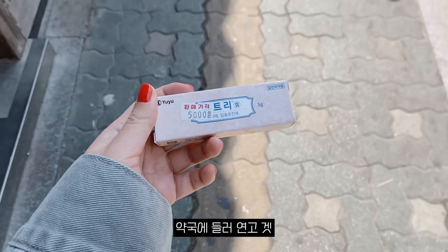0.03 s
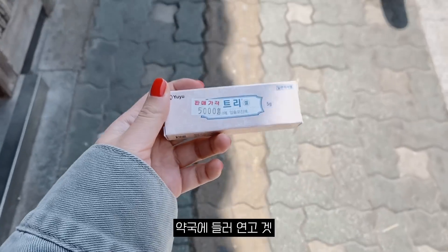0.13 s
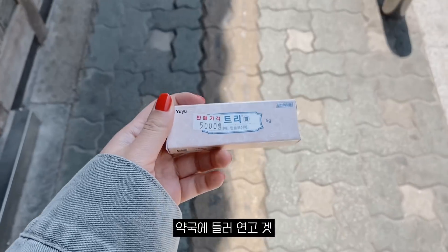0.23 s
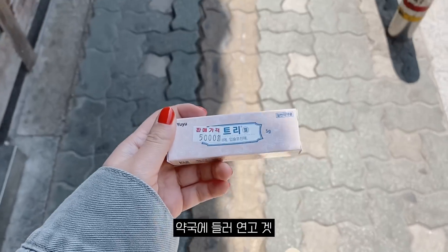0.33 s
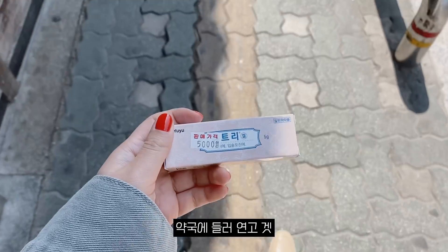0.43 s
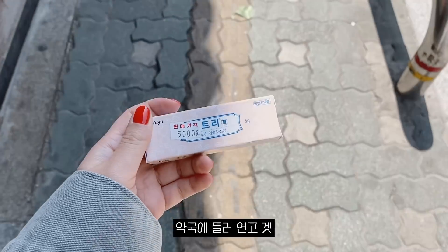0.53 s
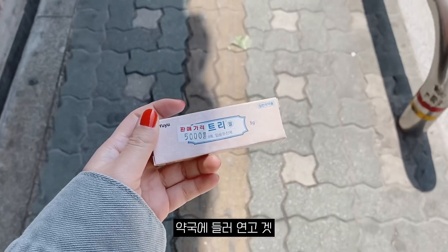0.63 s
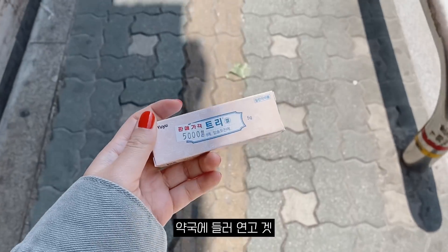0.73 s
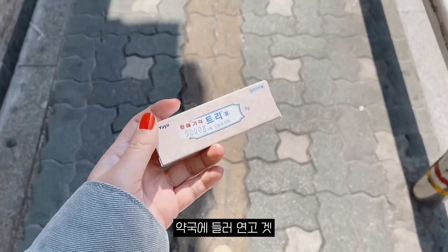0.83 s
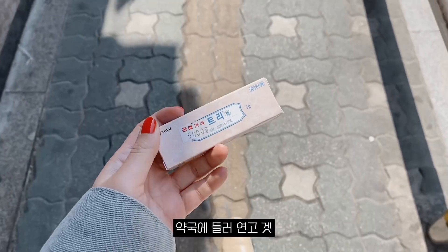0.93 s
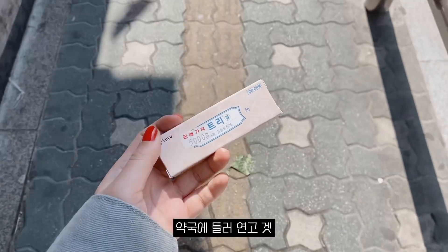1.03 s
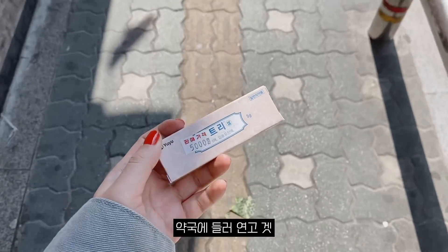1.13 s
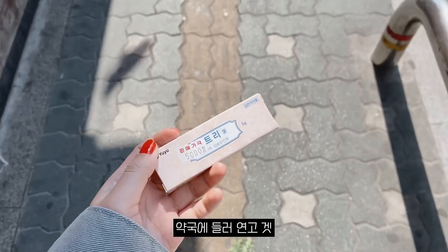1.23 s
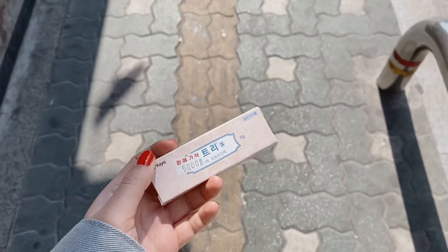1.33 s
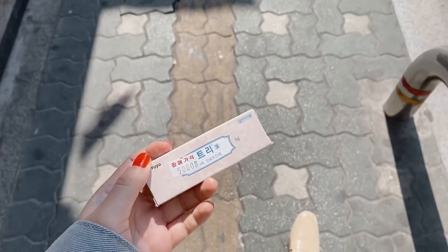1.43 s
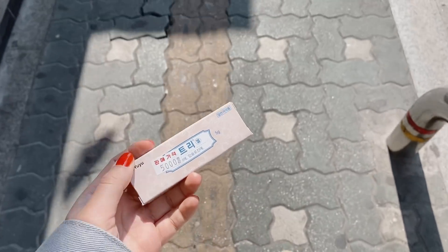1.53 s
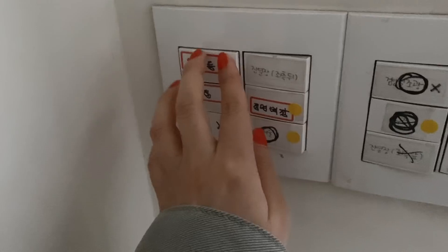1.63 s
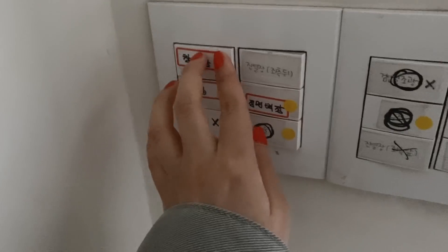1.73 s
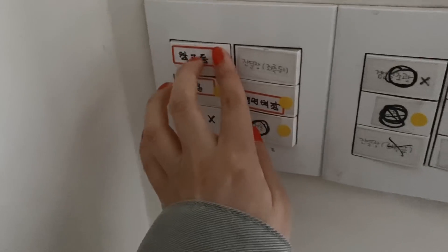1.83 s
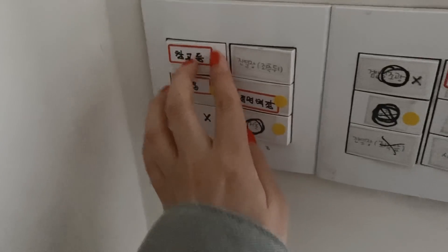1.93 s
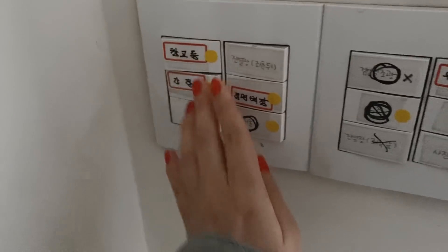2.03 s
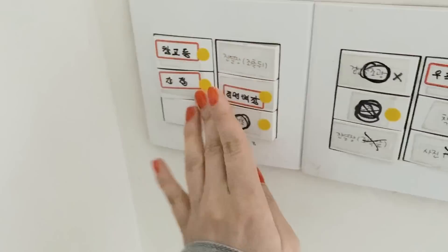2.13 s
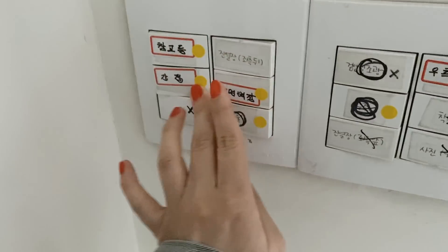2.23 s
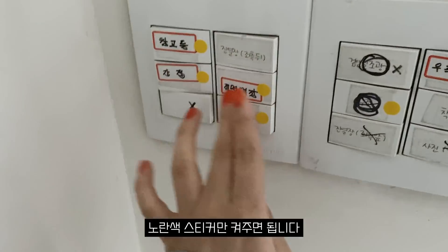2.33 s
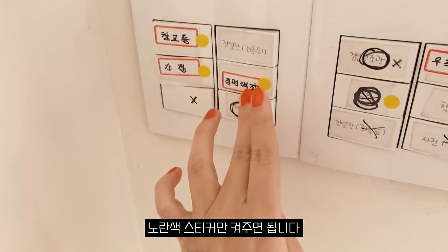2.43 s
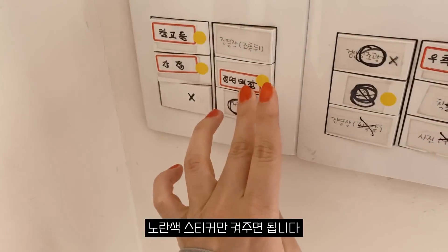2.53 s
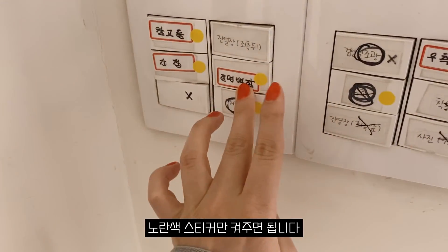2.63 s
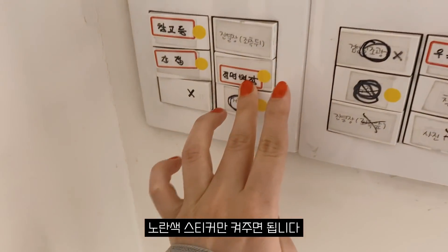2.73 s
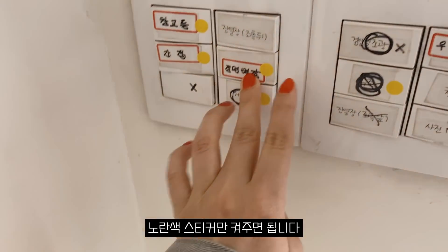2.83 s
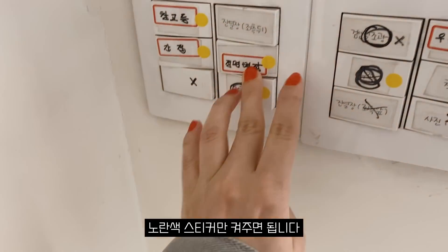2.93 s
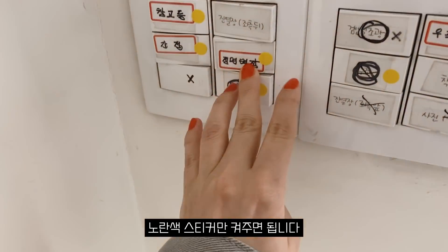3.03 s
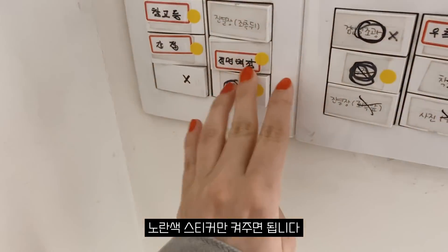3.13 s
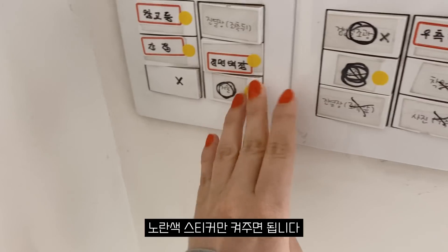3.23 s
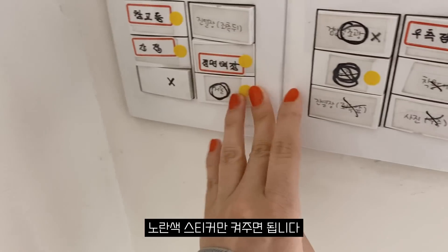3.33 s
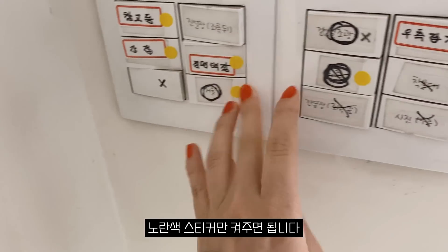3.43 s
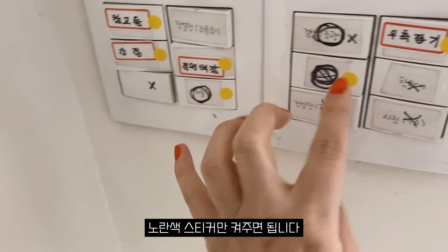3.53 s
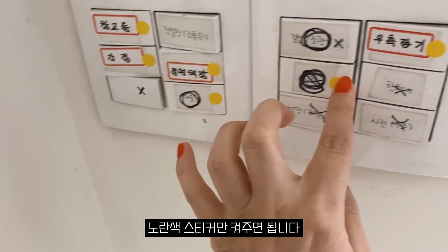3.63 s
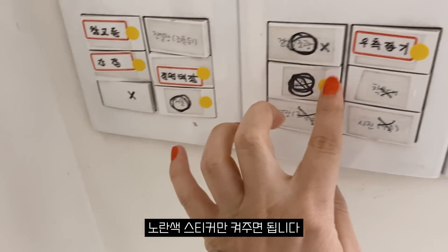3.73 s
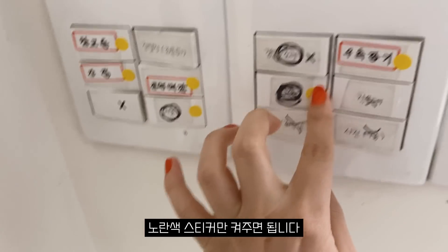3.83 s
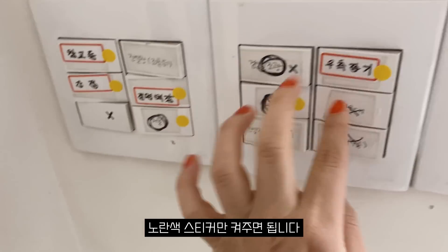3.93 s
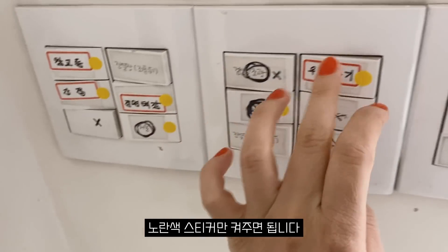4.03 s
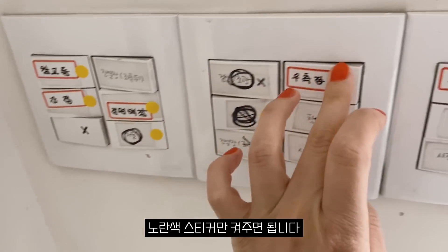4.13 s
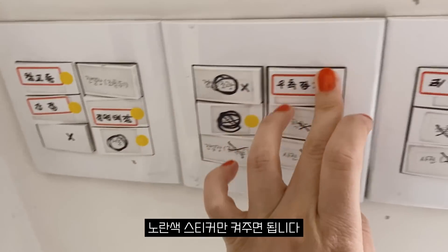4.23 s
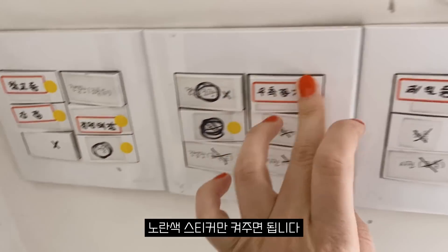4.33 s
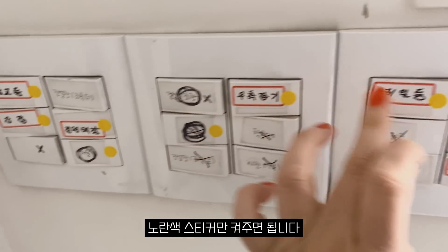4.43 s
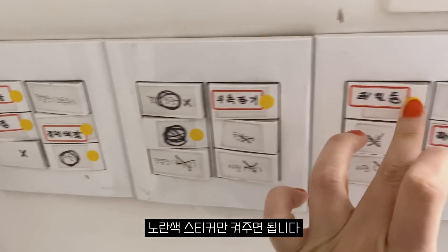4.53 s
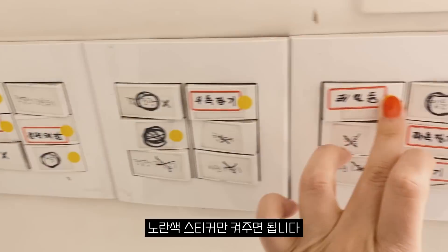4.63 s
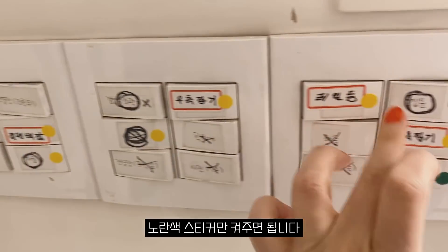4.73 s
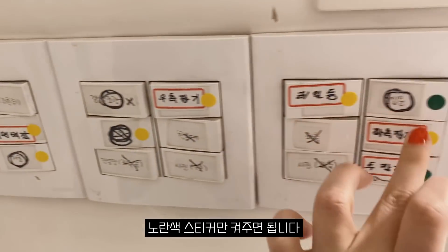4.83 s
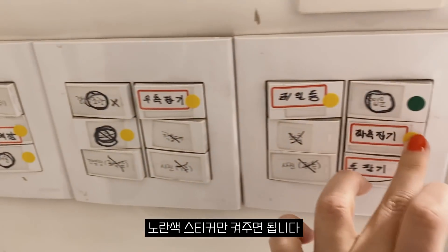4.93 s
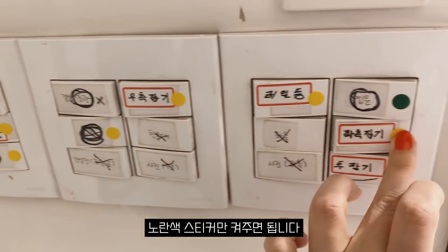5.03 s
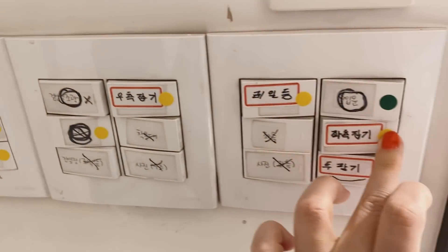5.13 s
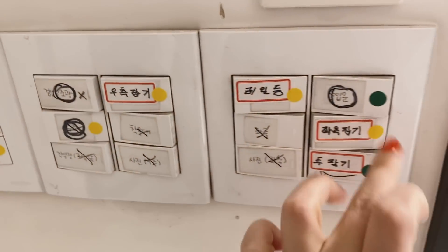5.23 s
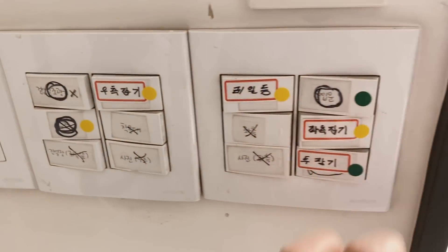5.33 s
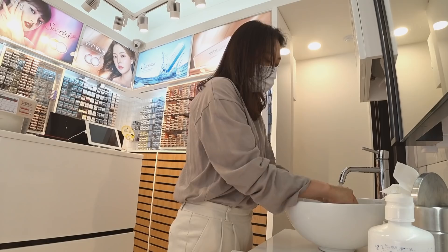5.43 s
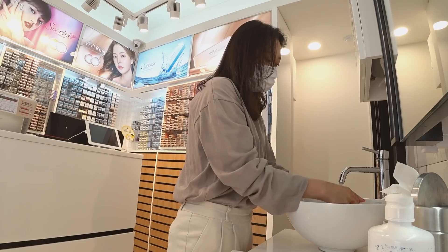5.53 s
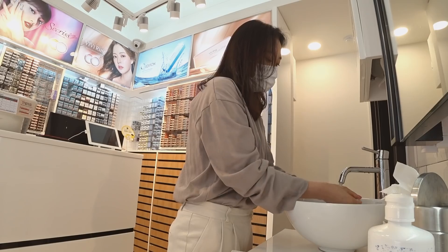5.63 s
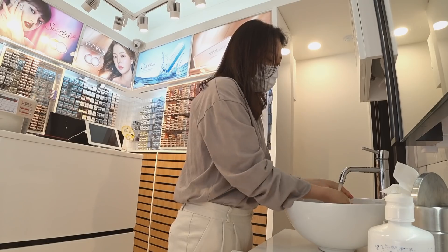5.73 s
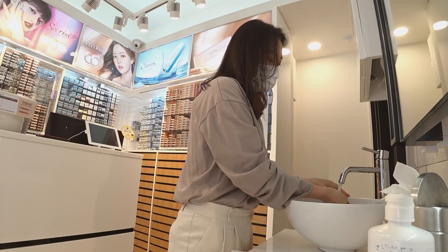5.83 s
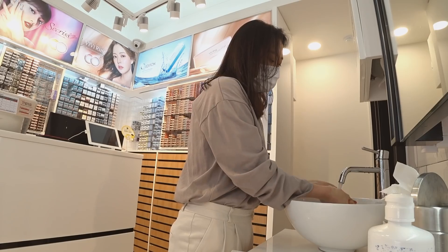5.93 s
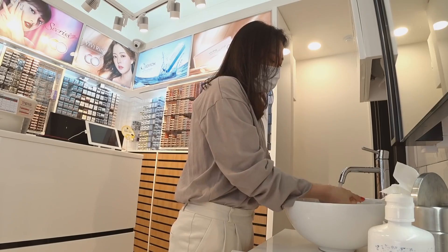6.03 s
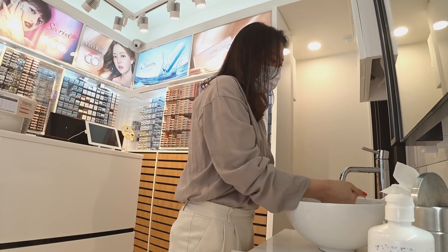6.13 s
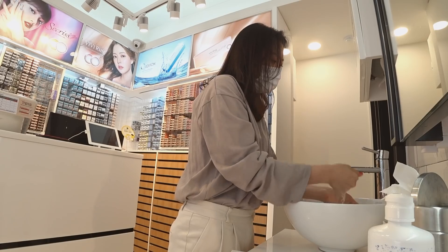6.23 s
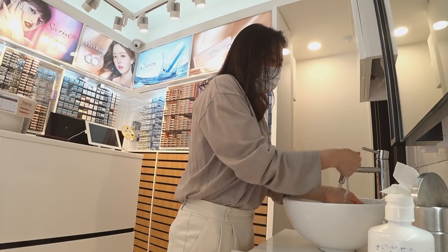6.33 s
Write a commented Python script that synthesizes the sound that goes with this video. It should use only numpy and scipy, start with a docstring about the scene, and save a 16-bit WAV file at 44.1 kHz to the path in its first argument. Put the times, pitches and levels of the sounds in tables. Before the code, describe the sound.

Soft street noise with thumps on the camera stops abruptly. In a hushed small room, eight wall switches click on unevenly, roughly every half second, loud and close in stereo, with short room echo and light fingertip taps between them. Then, at another abrupt cut, running water fills the scene: an aerated jet in a hard basin, with fine droplets, spatters and low appliance hum.

```python
"""Eight plastic rocker switches snap on in a quiet shop, close to a stereo microphone: each is a contact
tick, a plate clack, a wall thud and a faint ring, with soft finger touches and rustle around them.
Before it comes a pavement: shaped noise for traffic and wind, bumps on a hand-held camera, gritty scuffs.
After it a tap runs into a ceramic basin: noise through resonances, rising droplet chirps and spatters,
over an appliance hum of three sines."""
import sys
import numpy as np
from scipy import signal
from scipy.fft import rfft, irfft, next_fast_len
from scipy.io import wavfile
from scipy.ndimage import uniform_filter1d, map_coordinates

SR = 44100
rng = np.random.default_rng(int(sys.argv[2]) if len(sys.argv) > 2 else 0)


def log_audio(samples):
    """Write samples as a 16-bit WAV file to the path given in sys.argv[1]."""
    # one column per channel
    frames = np.atleast_2d(samples).T
    # limit to full scale, then quantise
    limited = np.clip(frames, -1, 1)
    pcm = np.round(limited * 32767).astype(np.int16)
    wavfile.write(sys.argv[1], SR, pcm)


N = 281212
TIME = np.arange(N) / SR
SHOP_S, BASIN_S = 1.641, 5.4365  # where the shop and the basin begin (s)

# Rocker snaps at close range; levels are rms over the first 40 ms, before the left-right shading.
# Each row: start in seconds, plate clack in dB, contact tick in dB, lingering ring in dB,
# wall thud in dB, favoured wall mode in Hz, lift of the lowest wall modes in dB.
SNAPS = [(1.838, -31, -24.5, -57.5, -32, 330, 9.5), (2.181, -28, -22.5, -57, -26, 400, -15.5),
         (2.9766, -28.5, -24, -55, -33.5, 470, 6.5), (3.3383, -25, -23, -54, -33.5, 480, 11),
         (3.7868, -28.5, -21.5, -57.5, -33, 422, 8.5), (4.2502, -26.5, -23, -51.5, -33.5, 145, 1),
         (4.6159, -26, -23, -54.5, -36, 330, 0), (5.0118, -24.5, -25, -53.5, -37, 470, 3)]
# Each rocker's own resonances, one list for each snap. Each row: centre in Hz, lift in dB.
ROCKER_RESONANCES = [
    [(980, 7.5), (1420, 3.5), (3740, 8), (4790, 4.5), (6500, 10.5), (7600, 16.5), (12350, 3)],
    [(830, 11), (1050, 6), (1400, 5), (1840, 7.5), (2730, 1.5), (6640, 5.5), (9420, 3)],
    [(1000, 5.5), (1370, 12.5), (1920, 6), (4530, 7.5), (6870, 5.5), (8700, 8.5), (10910, 4)],
    [(750, 4.5), (1370, 2), (2350, 13), (2750, 7), (5180, 3.5), (6210, 2.5), (8320, 8)],
    [(1150, 7), (1280, 7.5), (2610, 10.5), (4580, 6.5), (6420, 4), (9210, 6.5), (11540, 7)],
    [(790, 7), (1340, 11), (2030, 7), (2610, 7), (3820, 8.5), (6790, 4.5), (9310, 5.5)],
    [(830, 7.5), (1050, 5.5), (2010, 12.5), (2610, 2), (3950, 7), (6790, 6.5), (8610, 5)],
    [(1270, 6), (2030, 13.5), (2350, 9.5), (2690, 15), (3750, 3.5), (4840, 11), (8040, 3), (9740, 4.5)],
]
ROCKER_Q, BEAMED = 8, .6  # sharpness; share of the lift heard only in the direct sound
# Colour of the plastic plate. Each row: frequency in Hz, relative level in dB.
PLATE_COLOUR = [(250, -42.5), (520, -6), (800, -5.5), (1300, -2.5), (1620, -5), (2100, -1.5), (2600, -3.5),
                (3200, -7.5), (4500, -6), (5300, -6.5), (7500, -47)]
# Colour of the spring contact. Each row: frequency in Hz, relative level in dB.
CONTACT_COLOUR = [(3500, -42.5), (5200, -8), (6500, -3.5), (7800, -0.5), (9400, 1.5), (10400, -2),
                  (11300, -3), (13200, -6), (15000, 3.5), (15700, 1.5), (16800, -23)]
# Modes that every snap shares. Each row: frequency in Hz, starting level in dB, t60 in seconds.
SHARED_MODES = [(1403, -34, .07), (2424, -43.5, 0.09), (4460, -35, 0.03), (6500, -33, 0.05),
                (11320, -31.5, 0.045), (15137, -33, .025)]
# Modes of the hollow wall behind the plate. Each row: frequency in Hz, relative level in dB, t60 in seconds.
WALL_MODES = [(142, -4, 0.19), (171.9, -3.5, 0.25), (203, -10, 0.25), (233, -11, 0.22), (276, -4, 0.095),
              (331, -4, 0.11), (396, -3.5, 0.056), (459.2, 2.5, 0.07), (564, -7, 0.052),
              (608.8, -4.5, 0.095)]
FOCUS_DB = 9  # wall modes fall away from the struck one (dB per octave)
BOOM_HZ, BOOM_WIDTH_HZ = 171, 87  # the weight of the hand brings out the lowest wall modes
# Fingertips landing on a rocker or letting go; levels as for the snaps.
# Each row: start in seconds, plate clack in dB, wall thud in dB, contact tick in dB, favoured wall mode in Hz.
FINGER_TOUCHES = [(2.557, -64.5, -54.5, -78.5, 470), (2.599, -79.5, -74, -79, 460),
                  (2.948, -67.5, -71, -69.5, 400), (3.173, -54, -47, -69.5, 450),
                  (3.486, -49.5, -46, -59, 300), (3.682, -57, -53.5, -62, 330),
                  (3.915, -69.5, -70, -59.5, 400), (3.956, -60, -63, -68.5, 175),
                  (4.181, -58.5, -65, -61.5, 175), (4.199, -55.5, -54.5, -61.5, 175),
                  (4.391, -50.5, -50, -60, 175), (4.593, -53, -52.5, -62, 175),
                  (4.739, -52.5, -58, -66, 300), (4.982, -57.5, -63.5, -67, 400),
                  (5.228, -64, -69, -78, 450)]
TOUCH_FOCUS_DB, TOUCH_BOOM_DB = 3.5, 4  # a light touch stirs all wall modes (dB per octave; lift in dB)
# The rocker rung by a touch. Each row: frequency in Hz, starting level against the clack in dB, t60 in seconds.
TOUCH_MODES = [(2350, -5.5, 0.036), (1350, 2.5, .05), (1050, 2.5, 0.082), (695, -4, 0.033)]
# The spring pings as a rocker starts to move. Each row: start in seconds, starting level in dB.
SPRING_PINGS = [(2.949, -54.5), (4.24, -52)]
# The pad of a finger pushing on the plate without a snap.
# Each row: start in seconds, wall thud in dB, favoured wall mode in Hz, lift of the lowest modes in dB.
FINGER_PRESSES = [(1.976, -41, 320, 11), (2.036, -40.5, 369, 11), (2.085, -49.5, 451, 4),
                  (4.205, -40, 134.6, 3)]
# Clack and tick against the thud (dB); a soft push stirs fewer wall modes (dB per octave).
PRESS_CLACK_DB, PRESS_TICK_DB, PRESS_FOCUS_DB = -20.5, -27, 12.5
# Soft rustle before, between and after the snaps.
# Each row: middle in seconds, level in dB, half length in seconds.
RUSTLE_SWELLS = [(1.653, -59, 0.026), (1.803, -74, .025), (2.007, -54.5, 0.17), (2.3, -55, 0.14),
                 (3.08, -65, 0.11), (3.26, -63.5, 0.054), (3.557, -66, 0.18), (4.467, -70.5, 0.088),
                 (4.738, -68.5, 0.093), (5.3, -71, .15)]
# Fingers and sleeve sliding over the plate. Each row: frequency in Hz, relative level in dB per Hz.
RUSTLE_SPECTRUM = [(100, -31), (180, 9), (450, 4.5), (800, -2), (2500, -9.5), (4000, -15.5), (7000, -22),
                   (11000, -21), (16000, -31.5)]
# The shop's echo. Each row: band in Hz, relative level in dB, t60 in seconds.
SHOP_ECHO = [(150, -11.5, 0.19), (453, 2.5, 0.26), (1040, 3.5, 0.19), (2300, -6, 0.24), (3920, -1.5, 0.22),
             (6860, -2.5, 0.24), (8500, -12, 0.15), (11600, -7.5, 0.29), (16000, -23, .15)]
# The left port hears most of the switches' range better. Each row: frequency in Hz, left minus right in dB.
PORT_SHADE = [(100, 4), (400, 4), (1200, 2), (2700, -0.5), (4000, 2), (6200, 1.5), (8000, 1.5),
              (16000, -0.5)]
# Low tone of the quiet shop. Each row: frequency in Hz, relative level in dB per Hz.
SHOP_TONE = [(15, -38), (25, 1.5), (70, 2.5), (161, -6), (301, -24.5), (700, -28.5), (2480, -35.5),
             (6000, -44), (11000, -49.5), (16000, -43)]

# Tap water in the basin. Each row: frequency in Hz, relative level in dB per Hz.
WATER_SPECTRUM = [(15, -38.5), (25, -12), (59, 0.5), (120, -5), (165, -11), (281, -11), (412, -13),
                  (456, -0.5), (588, -13.5), (703, -13), (1000, -13), (1710, -15.2), (2510, -17),
                  (2780, -22), (8100, -20), (11000, -23), (14300, -71), (22000, -120)]
# Stereo image of the water. Each row: frequency in Hz, left-right likeness from -1 to 1.
WATER_LIKENESS = [(60, 0.98), (130, 1), (290, 0.9), (640, 0.86), (1410, 0.48), (3100, 0.69), (6820, 0.6),
                  (15000, 0.77)]
# Resonances of the basin and its corner. Each row: centre in Hz, width in Hz, lift in dB.
BASIN_MODES = [(215, 50, 7), (303, 134, 9), (445, 72, -1.5), (709, 79, 12.5), (825, 35, 9), (1300, 72, 3),
               (1753, 36, 8.5), (1780, 110, 3.5), (2756, 46, 11.5), (2985, 300, 7.5), (3820, 740, 6)]
# Appliance hum behind the tap. Each row: frequency in Hz, level in dB rms before the port trim.
HUM_TONES = [(59.3, -48.5), (275, -59.5), (457.5, -56.5)]
SPLASH_PER_S, SPLASH_DB, SPLASH_SPREAD_DB = 7, -47.5, 0.5  # rms over 40 ms before the port trim, +/- spread

# Dull bumps on the camera. Each row: middle in seconds, level in dB, pitch in Hz.
CAMERA_BUMPS = [(0.593, -26.5, 84), (0.666, -24, 80.5), (0.782, -18, 64), (0.842, -17.5, 93),
                (0.873, -21.5, 57.6), (0.934, -28, 70), (1.11, -17.5, 119), (1.22, -20, 74),
                (1.349, -30, 61.8)]
# Air puffed by a bump. Each row: frequency in Hz, relative level in dB per Hz.
PUFF_SPECTRUM = [(40, -27), (110, -2), (190, 0.5), (280, -5.5), (450, -41), (1000, -76)]
# Scuffs on the pavement, loud and soft.
# Each row: start in seconds, level in dB before colouring, brightest frequency in Hz.
PAVEMENT_SCUFFS = [(.099, -44, 3970), (.443, -25, 940), (.509, -31.5, 1800), (0.953, -19.5, 520),
                   (1.02, -31.5, 1490), (1.056, -50, 4450), (1.13, -52.5, 6860), (1.153, -33.5, 2950),
                   (1.211, -34.5, 1980), (1.509, -49, 4770)]
# Random gritty ticks, some as loud as the softer scuffs; dB before colouring, +/- spread.
GRIT_PER_S, GRIT_DB, GRIT_SPREAD_DB, GRIT_HZ = 11, -46.5, 12, 2260
# Strength of the air buffeting the microphone. Each row: time in seconds, level in dB.
WIND_LEVEL = [(0, -47.5), (.42, -39), (.65, -29.5), (.9, -34), (1.15, -38.5), (1.4, -33.5), (1.62, -36.5)]
# Colour of that air. Each row: frequency in Hz, relative level in dB per Hz.
WIND_SPECTRUM = [(20, -29), (45, 9.5), (65, 12), (110, -3.5), (220, -2.5), (400, -29), (1000, -85)]
# Distant traffic. Each row: frequency in Hz, relative level in dB per Hz.
TRAFFIC_SPECTRUM = [(15, -45), (25, -8), (40, -2), (58, -3), (229, -1), (624, -4.5), (800, -9),
                    (1740, -12.5), (2500, -21.5), (3200, -26), (4200, -33.5), (5880, -35.5), (8000, -46),
                    (11500, -43), (16000, -59)]
# Stereo image of the traffic. Each row: frequency in Hz, left-right likeness from -1 to 1.
TRAFFIC_LIKENESS = [(60, 1), (290, 0.74), (640, -0.25), (1400, 0.026), (3100, -0.0026), (15000, -0.076)]


def switches():
    """A snap is a tick and a clack coloured by the rocker, shared modes, a wall thud and a lingering ring."""
    out = np.zeros((2, N))
    t = np.arange(SR * 2 // 3) / SR
    for snap, resonances in zip(SNAPS, ROCKER_RESONANCES):
        s, clack_db, tick_db, spring_db, thud_db, wall_hz, boom_db = snap

        def rocker(hz):
            return sum(lift(hz, centre_hz, centre_hz / ROCKER_Q, db) for centre_hz, db in resonances)

        def beam(hz):
            return BEAMED * rocker(hz)

        def all_round(hz):
            return rocker(hz) - beam(hz)

        clack = plastic(t, lambda hz: read(PLATE_COLOUR, hz) + all_round(hz), clack_db,
                        t60=0.026, chatter_s=0.0017, spread=0.47, lag_s=.000048, wet_db=2.5, beam=beam)
        tick = plastic(t, lambda hz: read(CONTACT_COLOUR, hz) + all_round(hz), tick_db,
                       t60=0.0097, chatter_s=0.0012, spread=0.08, lag_s=0.0001763, wet_db=-0.5, beam=beam)
        add(out, s, clack + tick + ringing(t, SHARED_MODES) + spring(t, spring_db))
        thud = wall(t, thud_db, wall_hz, FOCUS_DB, boom_db, swell_cycles=1.4, wet_db=-6)
        add(out, s + .003, thud)  # the rocker bottoms out on the wall just after the contact snaps
    return out


def plastic(t, curve, db, t60, chatter_s, spread, lag_s, wet_db, beam=lambda hz: 0, ripple_db=1.5, rise_s=.0004):
    """Rattling holds while the rocker chatters on its stop, then dies; beamed modes skip the room echo."""
    ring = amp(-60 * np.maximum(t - chatter_s, 0) / t60) * (1 - np.exp(-t / rise_s))
    modes_hz = np.geomspace(500, 17000, num=50)
    ripple = ripple_db * rng.standard_normal(len(modes_hz))  # each blow favours other modes
    direct = ports(chatter(ring), t, spread, lag_s)
    direct = colour(direct, lambda hz: beam(hz) + np.interp(hz, modes_hz, ripple))
    return at_level(colour(direct + amp(wet_db) * room_tail(t), curve), db)


def chatter(envelope, size=500):
    """A short burst of random rattling, evened out to equal energy in all bands."""
    burst = rng.standard_normal(len(envelope)) * envelope
    power_db = 10 * np.log10(uniform_filter1d(abs(rfft(burst)) ** 2, size))
    burst_hz = np.fft.rfftfreq(len(burst), 1 / SR)
    return colour(burst[None], lambda hz: -np.interp(hz, burst_hz, power_db))[0]


def wall(t, db, wall_hz, focus_db, boom_db, swell_cycles=1.5, wet_db=-3):
    """Wall modes swell over a few cycles and decay; the place of the blow favours those near wall_hz."""
    hz, mode_db, t60 = np.transpose(WALL_MODES)[:, :, None]
    mode_db = mode_db - focus_db * abs(np.log2(hz / wall_hz))
    mode_db = mode_db + lift(hz, BOOM_HZ, BOOM_WIDTH_HZ, boom_db)
    size = amp(mode_db - 60 * t / t60) * (1 - np.exp(-t * hz / swell_cycles))
    detune = rng.uniform(.98, 1.02, hz.shape)
    turns = hz * detune * t + rng.random(hz.shape)
    direct = ports((size * np.sin(2 * np.pi * turns)).sum(0), t, spread=0.35, lag_s=0)
    return at_level(in_room(direct, t, wet_db), db)


def spring(t, db, centre_hz=2580, width_hz=700, t60=0.51):
    """A narrow band of noise, probably the springs, decays slowly and outlasts the clack."""
    hz = np.fft.rfftfreq(len(t), 1 / SR)
    band = np.exp(-(2 * (hz - centre_hz) / width_hz) ** 2)
    ring = irfft(rfft(rng.standard_normal((2, len(t)))) * band, len(t))
    return at_level(ring * amp(-60 * t / t60), db)


def ringing(t, modes, wet_db=-4, port_radians=1.0):
    """Decaying sines (Hz, dB, t60 s), out of step at the two ports, sound in the room."""
    hz, db, t60 = np.transpose(modes)[:, :, None]
    size = amp(db - 60 * t / t60)
    direct = np.array([(size * np.sin(2 * np.pi * hz * t + lead)).sum(0) for lead in (0, port_radians)])
    return in_room(direct, t, wet_db)


def touches():
    """Fingers land on the rockers or let go, springs ping, and now and then a finger pushes dully."""
    out = np.zeros((2, N))
    t = np.arange(SR // 2) / SR
    for s, clack_db, thud_db, tick_db, wall_hz in FINGER_TOUCHES:
        touch = nudge(thud_db, clack_db, tick_db, wall_hz, TOUCH_FOCUS_DB, TOUCH_BOOM_DB)
        add(out, s, touch + amp(clack_db) * ringing(t, TOUCH_MODES))
    for s, db in SPRING_PINGS:
        add(out, s, ringing(t, [(2404, db, .12)]))
    for s, db, wall_hz, boom_db in FINGER_PRESSES:
        add(out, s, nudge(db, db + PRESS_CLACK_DB, db + PRESS_TICK_DB, wall_hz, PRESS_FOCUS_DB, boom_db))
    return out


def nudge(thud_db, clack_db, tick_db, wall_hz, focus_db, boom_db):
    """A fingertip nudges a rocker: a slower, softer blow on the same parts."""
    t = np.arange(SR // 2) / SR
    clack = plastic(t, lambda hz: read(PLATE_COLOUR, hz) + read([(600, 3.5), (4000, -6.5)], hz), clack_db,
                    t60=.05, chatter_s=.002, spread=.5, lag_s=.00002, wet_db=2.5)
    tick = plastic(t, lambda hz: read(CONTACT_COLOUR, hz) + read([(5000, -1.0), (15000, -5.0)], hz), tick_db,
                   t60=.025, chatter_s=0.0022, spread=0.2, lag_s=0.00018, wet_db=0.5)
    return clack + tick + wall(t, thud_db, wall_hz, focus_db, boom_db, swell_cycles=0.53, wet_db=-3)


def rustle():
    """Skin and cloth brush unevenly over the plates: flickering noise that swells at listed times."""
    gain = amp(-81)  # hand at rest
    for s, db, half_s in RUSTLE_SWELLS:
        gain = gain + amp(db) * np.exp(-((TIME - s) / half_s) ** 2)
    brush = noise(RUSTLE_SPECTRUM, [(150, 0.56), (1000, 0.16), (10000, .3)])
    return gain * flicker(brush, depth_db=4.0, patch_hz=1530, patch_s=0.031)


def room_tail(t, build_s=0.0011, late_db=-25, late_t60=0.54):
    """Noise echo, each band dying at its own speed; the far end of the shop lingers faintly."""
    hz, when, z = signal.stft(rng.standard_normal((2, len(t))), SR, nperseg=256)
    t60 = read(SHOP_ECHO, hz, axis=2)[:, None]
    decay = np.hypot(amp(-60 * when / t60), amp(late_db - 60 * when / late_t60))
    even_energy = np.sqrt(np.log(10 ** 6) / (t60 * SR))  # long bands start lower
    z *= amp(read(SHOP_ECHO, hz))[:, None] * decay * even_energy
    tail = signal.istft(z, SR, nperseg=256)[1][:, :len(t)]
    return tail * np.minimum(t / build_s, 1) ** 2


def in_room(direct, t, wet_db):
    """The direct sound plus its echo from the shop."""
    echo = signal.fftconvolve(direct, amp(wet_db) * room_tail(t), axes=1)
    return direct + echo[:, :len(t)]


def ports(x, t, spread, lag_s):
    """Sound reaches the left port later by lag_s; scatter from hand and wall differs at each port."""
    hz = np.fft.rfftfreq(len(t), 1 / SR)
    delay = np.exp(-2j * np.pi * hz * np.array([[lag_s], [0]]))
    direct = rfft(x / np.linalg.norm(x)) * delay
    scatter = rng.standard_normal((2, len(t))) * amp(-60 * t / 0.064)
    return irfft(direct * (1 + spread * rfft(scatter / np.linalg.norm(scatter[0]))), len(t))


def shop():
    """Switches, fingers and rustle, shaded differently at each port, over the low tone of the room."""
    left, right = switches() + touches() + rustle()
    left = colour(left[None], lambda hz: read(PORT_SHADE, hz) / 2)
    right = colour(right[None], lambda hz: -read(PORT_SHADE, hz) / 2)
    return (np.vstack([left, right]) + room_tone()) * shot(SHOP_S, BASIN_S)


def tap():
    """An aerated jet: flickering noise lifted by the basin's resonances, with droplets and spatters."""
    jet = noise(WATER_SPECTRUM, WATER_LIKENESS)
    jet = colour(jet, lambda hz: sum(lift(hz, *mode) for mode in BASIN_MODES))
    jet = flicker(jet, depth_db=0.9, patch_hz=744, patch_s=0.031)
    return amp(-38.5) * jet + amp(-56) * droplets() + splashes()


def droplets(per_s=500, count=30):
    """Small bubbles and drops ring briefly in the basin: decaying sines that rise in pitch."""
    out = np.zeros((2, N))
    t = np.arange(SR // 40) / SR
    for hz in np.geomspace(1200, 9500, count):
        hits = rng.random(N) < per_s / count / SR
        sizes = amp(5 * np.minimum(rng.exponential(1, N), 4))
        ring = np.sin(2 * np.pi * hz * t * (1 + 3 * t)) * np.exp(-t * hz / 5)
        out += rng.uniform(0.57, 1, (2, 1)) * signal.oaconvolve(hits * sizes, ring)[:N]
    return unit(out)


def splashes():
    """The jet breaks on a hand: short bursts of spiky noise, brightest near 7 kHz."""
    out = np.zeros((2, N))
    t = np.arange(SR // 15) / SR
    bright = [(600, -20), (3000, -4), (7000, 9.0), (11000, -4)]  # Hz, dB
    for s, db in scattered(BASIN_S, N / SR, SPLASH_PER_S, SPLASH_DB, SPLASH_SPREAD_DB):
        spatter = rng.laplace(size=len(t)) * amp(-60 * t / 0.23)
        pair = colour(ports(spatter, t, spread=0.55, lag_s=0), lambda hz: read(bright, hz))
        add(out, s, at_level(pair, db))
    return out


def basin():
    """The tap over the appliance, slightly stronger at the right port, band-limited."""
    trim = amp([[-.4], [.4]])
    return lowpass((tap() + appliance()) * trim, 11000) * shot(BASIN_S, np.inf)


def bumps():
    """A bump on the camera is a brief sine under a bell curve, with a puff of air around it."""
    out = np.zeros((2, N))
    air = noise(PUFF_SPECTRUM, [(50, 0.66), (300, 0.53)])
    for s, db, hz in CAMERA_BUMPS:
        out += amp(db - 14) * np.exp(-((TIME - s) / 0.017) ** 2) * air
        turns = hz * (TIME - s)
        out += amp(db) * np.exp(-(turns / 0.56) ** 2) * np.sin(2 * np.pi * turns)
    return out


def scuffs():
    """Short decaying noise: each scuff loudest around its own frequency, the grit around a shared one."""
    out = np.zeros((2, N))
    t = np.arange(SR // 12) / SR
    ticks = [(s, db, GRIT_HZ) for s, db in scattered(0, SHOP_S, GRIT_PER_S, GRIT_DB, GRIT_SPREAD_DB, count=24)]
    for s, db, bright_hz in PAVEMENT_SCUFFS + ticks:
        grit = rng.standard_normal((2, len(t))) * amp(-60 * t / 0.052)
        scuff = colour(grit, lambda hz: 9 - 13 * abs(np.log2((hz + 1) / bright_hz)))
        add(out, s, amp(db) * scuff)
    return out


def street():
    """The pavement: bumps and small scuffs, buffeting air and distant traffic."""
    return (bumps() + scuffs() + wind() + traffic()) * shot(-1, SHOP_S)


def wind():
    """Air buffeting the microphone: low noise that swells and sinks."""
    return level(WIND_LEVEL) * noise(WIND_SPECTRUM, [(50, 0.66), (300, 0.64)])


def traffic():
    """Distant traffic: flickering noise that slowly recedes, from -35 dB down by 2.5 dB per second."""
    rumble = noise(TRAFFIC_SPECTRUM, TRAFFIC_LIKENESS)
    return amp(-35 - 2.5 * TIME) * flicker(rumble, depth_db=1.54, patch_hz=362, patch_s=0.0582)


def appliance():
    """An appliance hums behind the tap: steady sines."""
    hum = np.zeros(N)
    for hz, db in HUM_TONES:
        hum += amp(db) * np.sqrt(2) * np.sin(2 * np.pi * (hz * TIME + rng.random()))
    return hum


def room_tone():
    """Steady low noise of the quiet shop, less alike at the two ports above the bass."""
    return amp(-60.5) * noise(SHOP_TONE, [(60, .9), (300, 0.61), (1000, 0.13), (10000, 0.22)])


def amp(db):
    """Decibels to gain."""
    return 10 ** (np.asarray(db) / 20)


def unit(x):
    """Scales to rms 1."""
    return x / np.sqrt(np.mean(x ** 2) + 1e-20)


def at_level(pair, db):
    """Sets the rms level of the first 40 ms."""
    return amp(db) * pair / np.sqrt(np.mean(pair[:, :SR // 25] ** 2))


def read(points, hz, axis=1):
    """One column of a table, joined on a log-frequency axis."""
    columns = np.transpose(points)
    return np.interp(np.log(hz + 1), np.log(columns[0] + 1), columns[axis])


def level(rows):
    """Gain over time from rows (s, dB)."""
    return amp(np.interp(TIME, *np.transpose(rows)))


def add(mix, s, sound):
    """Mixes a stereo sound in at time s."""
    part = mix[:, max(round(s * SR), 0):][:, :sound.shape[1]]
    part += sound[:, :part.shape[1]]


def scattered(start, end, per_s, db, spread_db, count=16):
    """Rows (s, dB) of small events at uneven intervals."""
    gap, size = rng.random((count, 2)).T
    times = start + np.cumsum(.5 + gap) / per_s - .5 / per_s
    return [(s, db + spread_db * (2 * k - 1)) for s, k in zip(times, size) if s < end]


def lift(hz, centre_hz, width_hz, db):
    """The hump of one resonance, in dB."""
    return db / (1 + (2 * (hz - centre_hz) / width_hz) ** 2)


def colour(x, curve, size=4096):
    """Causal minimum-phase filter whose gain in dB is curve(Hz)."""
    log_gain = np.log(amp(curve(abs(np.fft.fftfreq(size, 1 / SR)))))
    taps = np.fft.ifft(np.exp(np.conj(signal.hilbert(log_gain)))).real[:size // 2]
    return signal.fftconvolve(x, taps[None], axes=1)[:, :x.shape[1]]


def lowpass(x, hz):
    """Steep band limit."""
    taps = signal.firwin(301, hz, window=("kaiser", 8), fs=SR)
    return signal.oaconvolve(x, taps[None], "same")


def noise(spectrum, likeness):
    """Stereo noise of rms 1 with a given spectrum and left-right likeness."""
    size = next_fast_len(N)
    hz = np.fft.rfftfreq(size, 1 / SR)
    a, b = rfft(rng.standard_normal((2, size)))
    same = np.clip(read(likeness, hz), -1, 1)
    pair = np.array([a, same * a + np.sqrt(1 - same ** 2) * b])
    return unit(irfft(pair * amp(read(spectrum, hz)), size)[:, :N])


def flicker(x, depth_db, patch_hz, patch_s):
    """Random patches of level, wandering over time and frequency; rms 1."""
    hz, when, z = signal.stft(x, SR, nperseg=512, noverlap=384)
    field = rng.standard_normal((200, 800))
    places = np.meshgrid(hz / patch_hz, when / patch_s, indexing="ij")
    patches = map_coordinates(field, places, order=1, mode="mirror")
    z = z * amp(depth_db * unit(patches))
    return unit(signal.istft(z, SR, nperseg=512, noverlap=384)[1][:, :N])


def shot(start, end):
    """Gate that opens between two times, with edges of 100 samples."""
    return uniform_filter1d(1. * ((TIME >= start) & (TIME < end)), size=100)


def scene():
    """Pavement, shop and basin, one after another."""
    return shop() + basin() + street()


def record(dry):
    """The recorder rounds off the highest peaks, then limits the band."""
    rounded = dry / (1 + (dry / .9) ** 6) ** (1 / 6)
    return lowpass(rounded, 16600)


dry = scene()
out = record(dry)
log_audio(out)
```